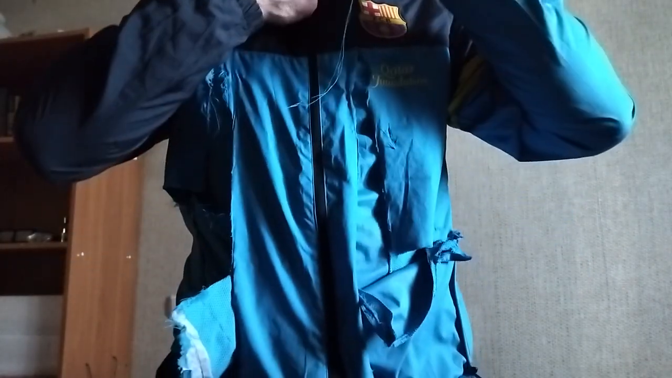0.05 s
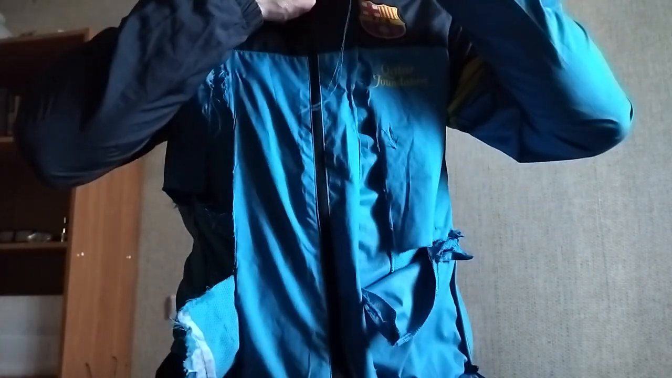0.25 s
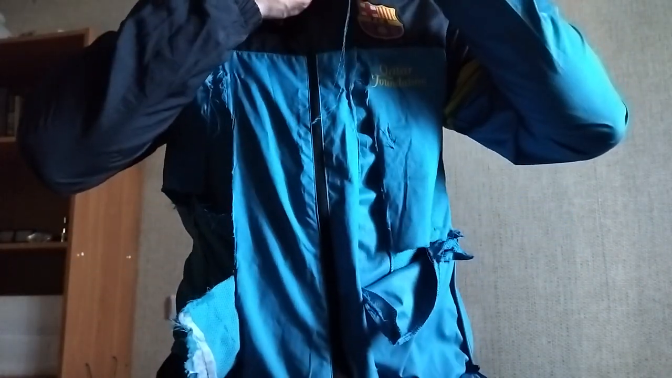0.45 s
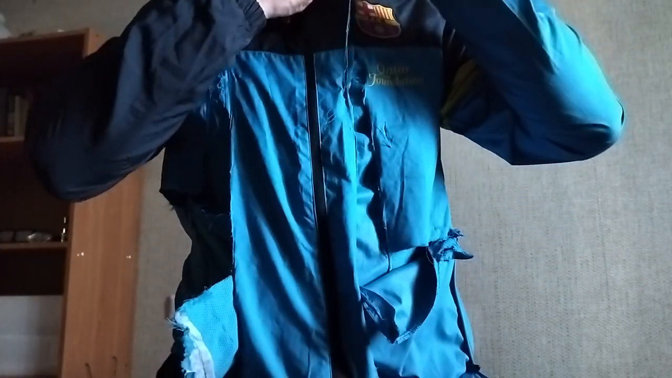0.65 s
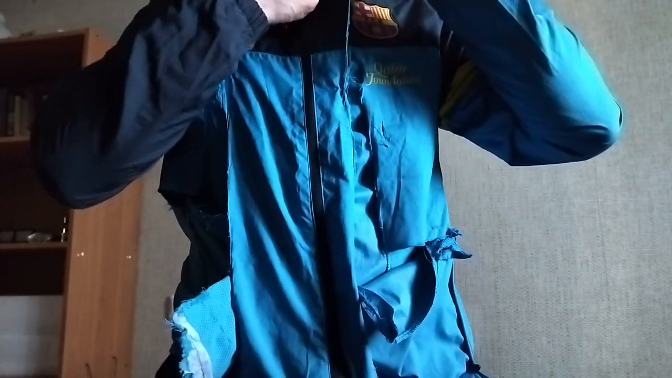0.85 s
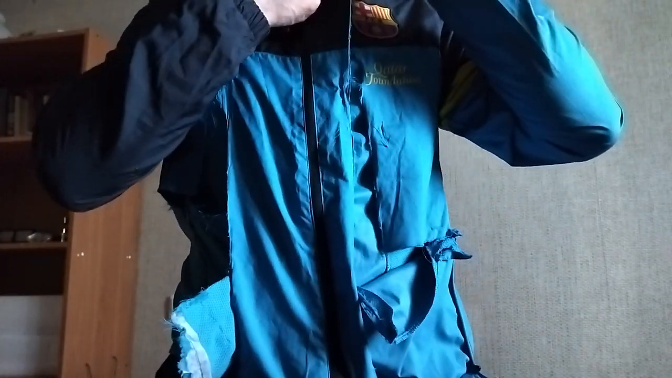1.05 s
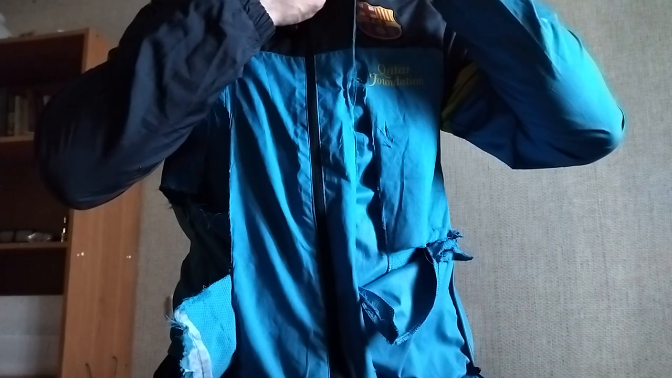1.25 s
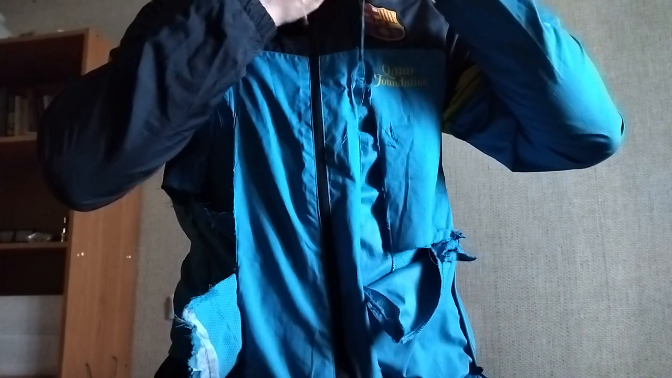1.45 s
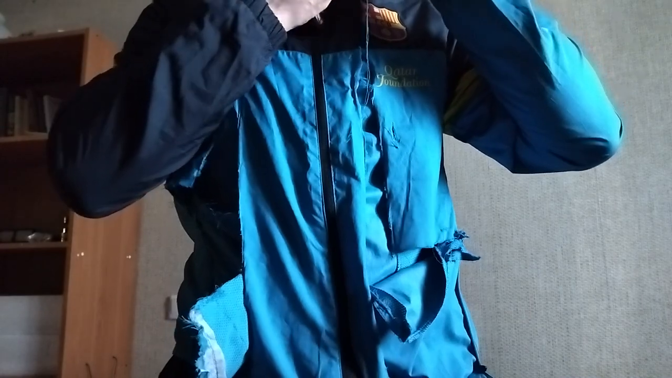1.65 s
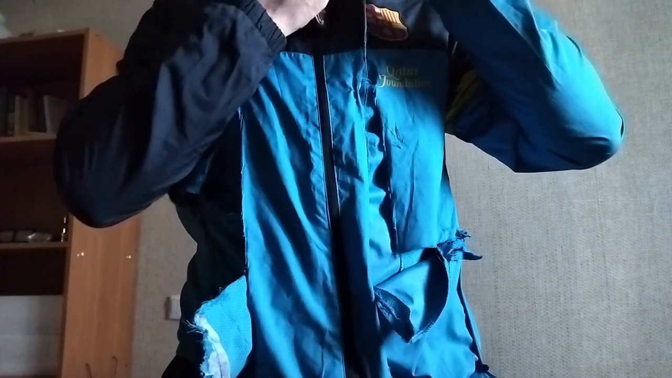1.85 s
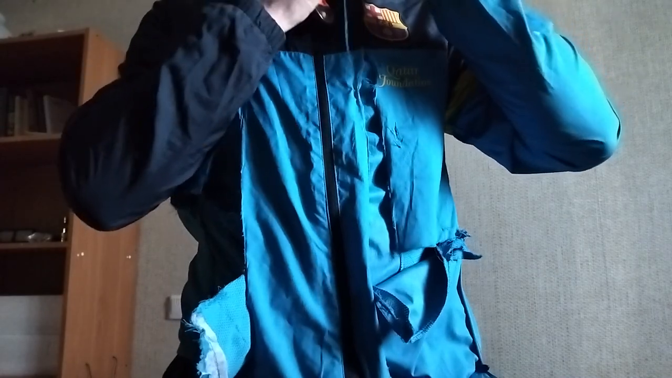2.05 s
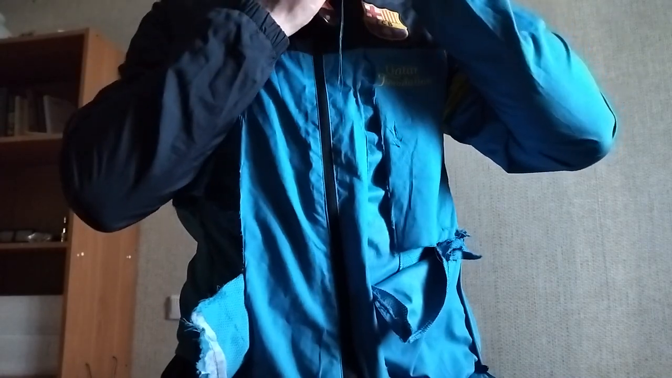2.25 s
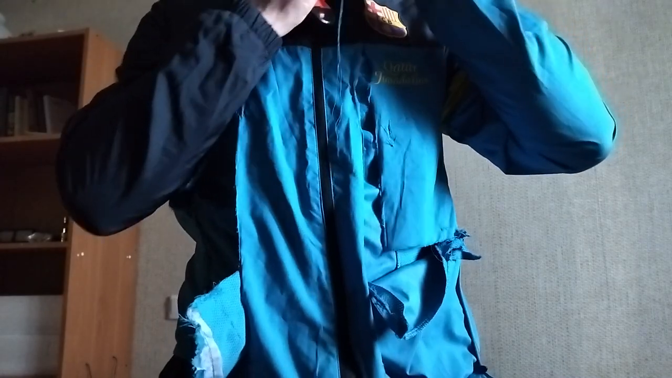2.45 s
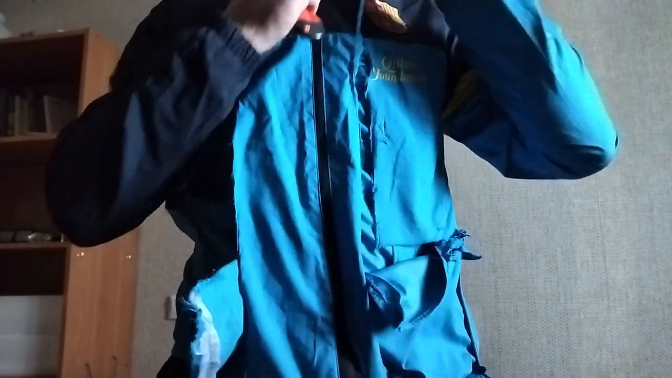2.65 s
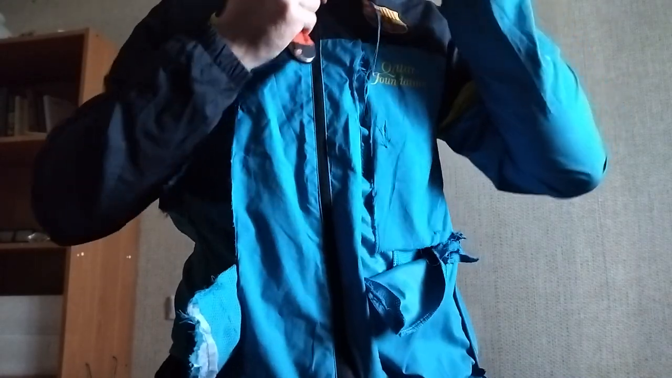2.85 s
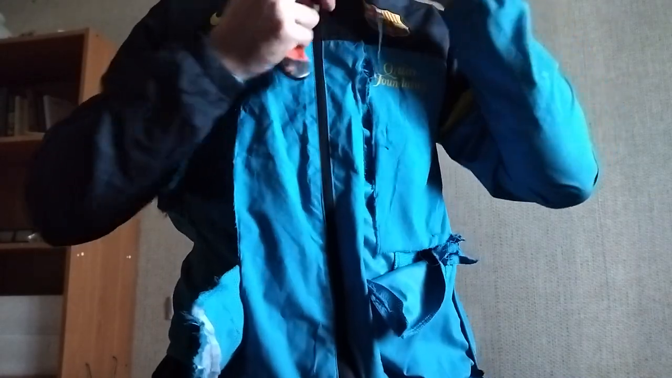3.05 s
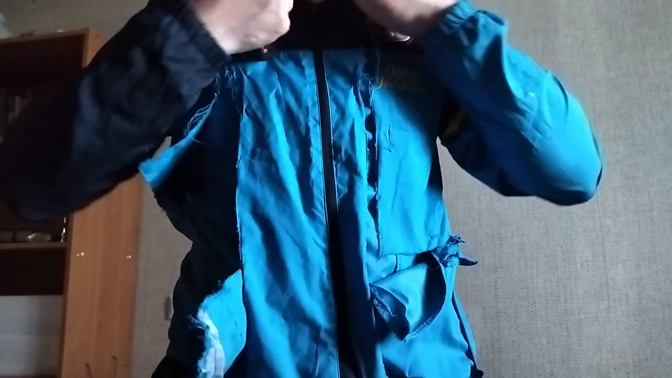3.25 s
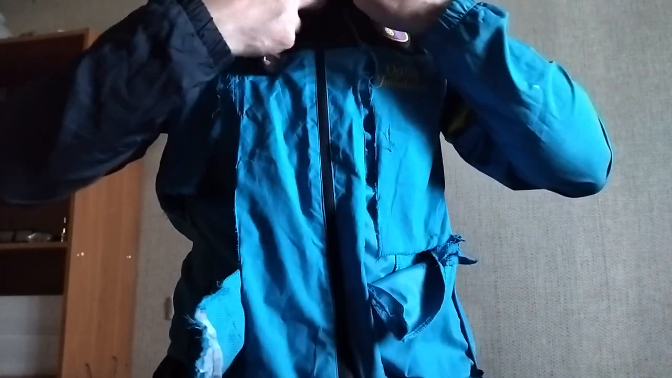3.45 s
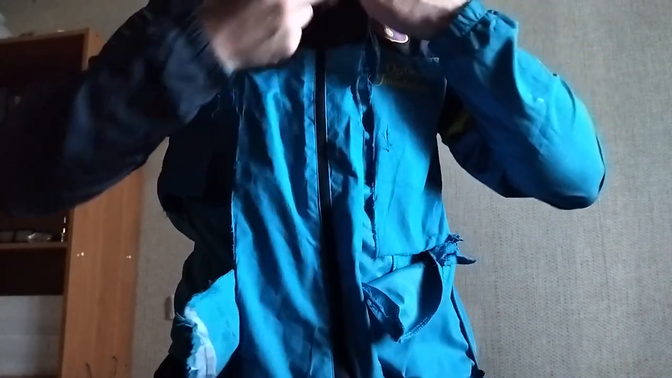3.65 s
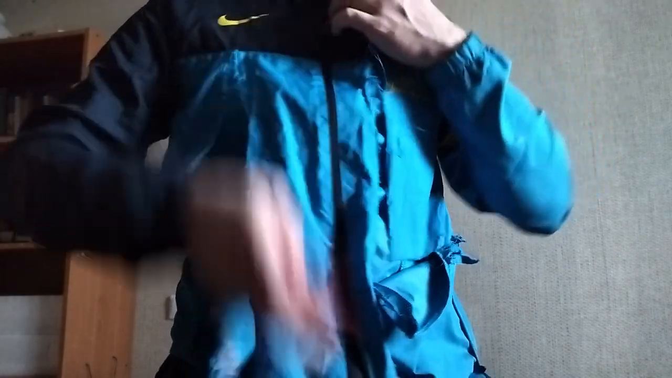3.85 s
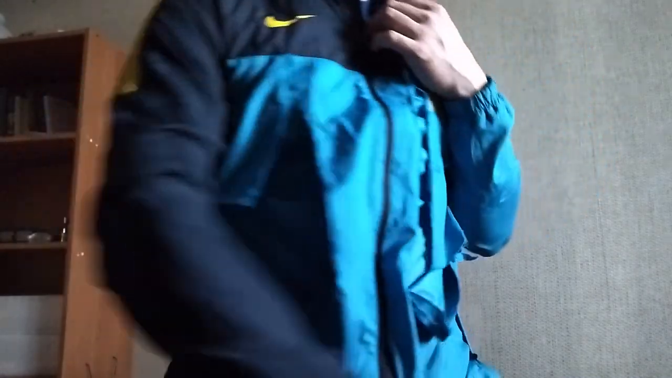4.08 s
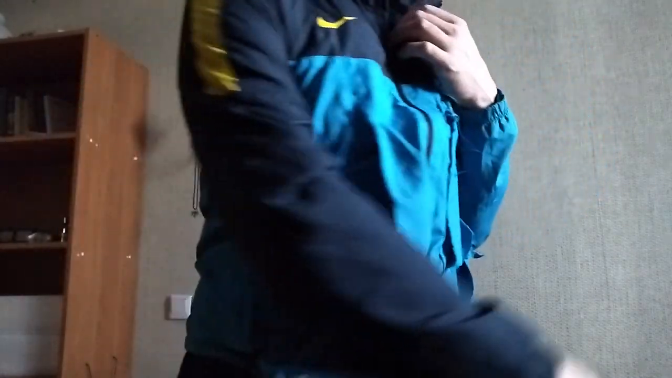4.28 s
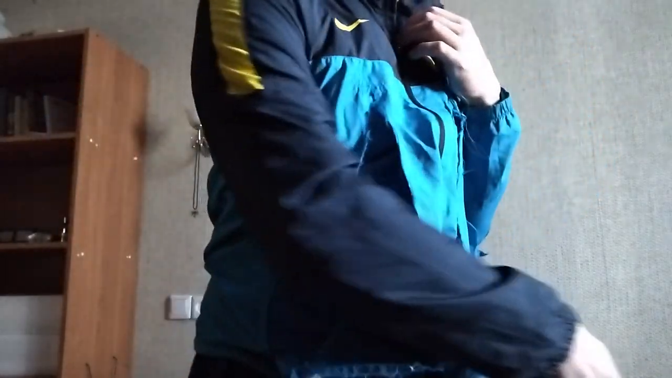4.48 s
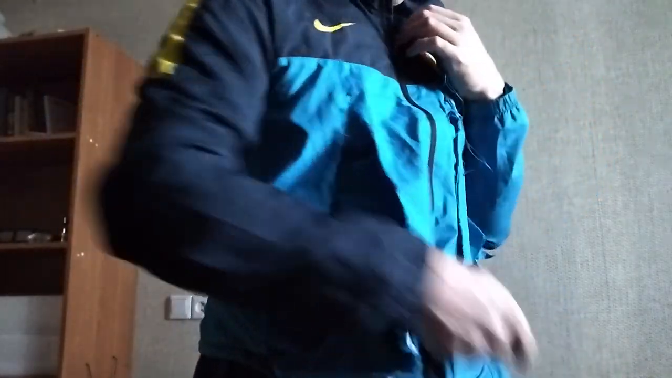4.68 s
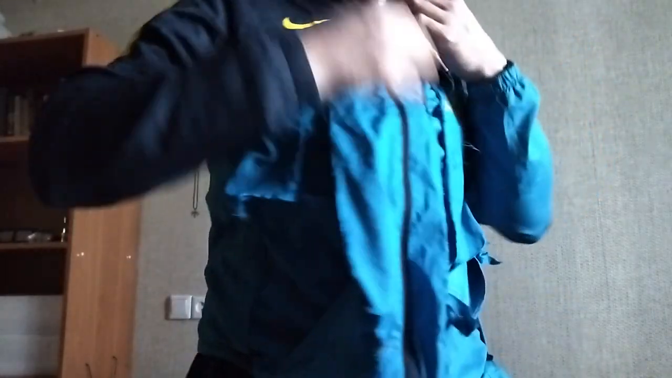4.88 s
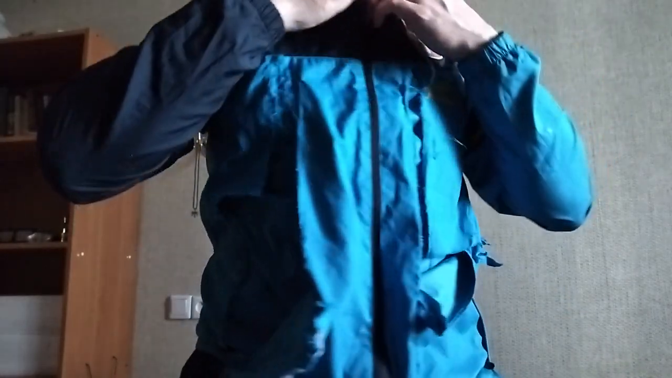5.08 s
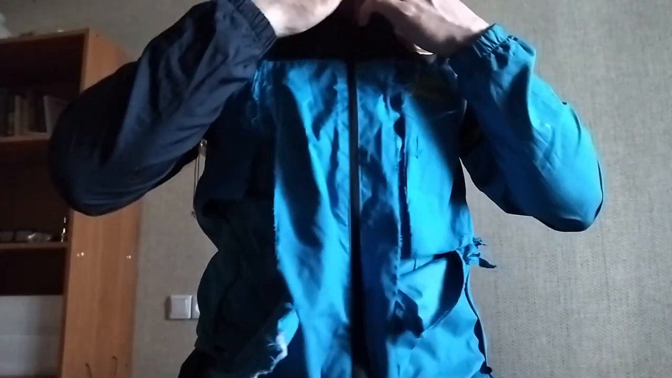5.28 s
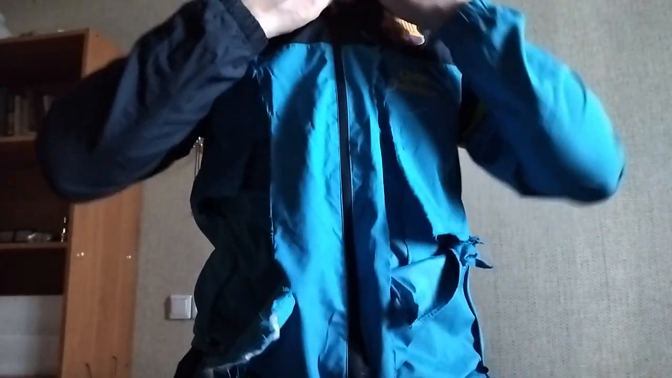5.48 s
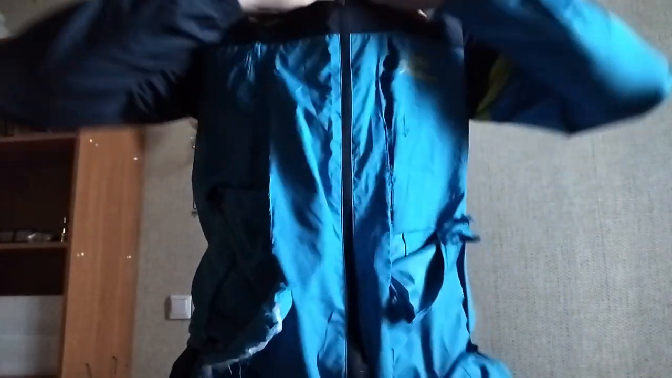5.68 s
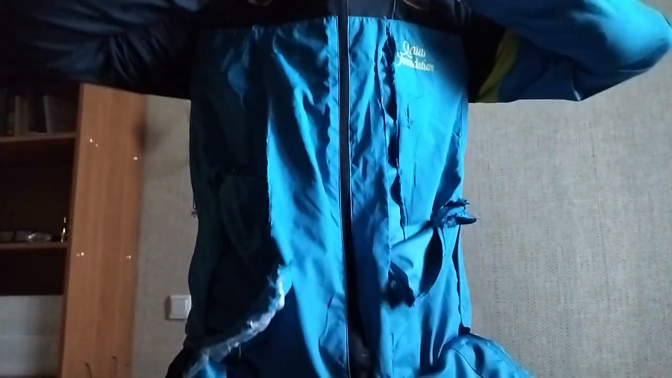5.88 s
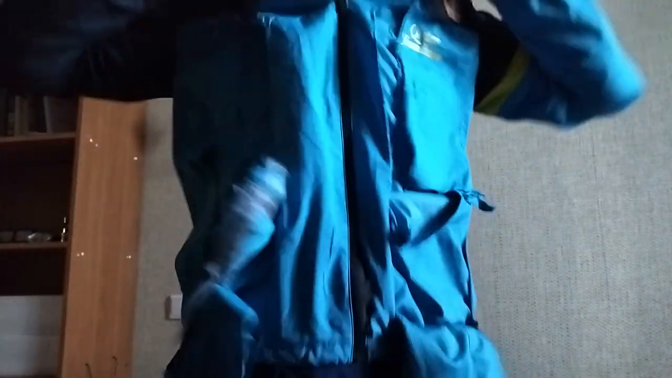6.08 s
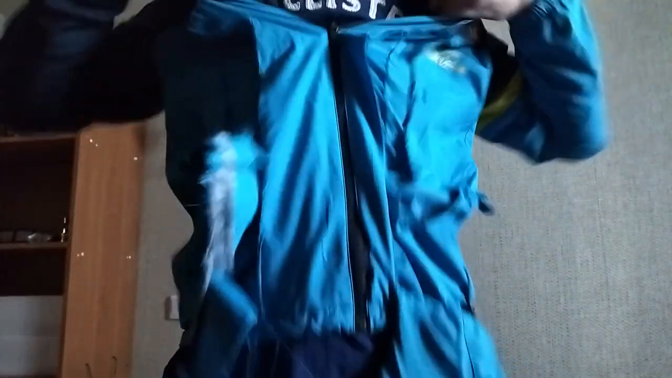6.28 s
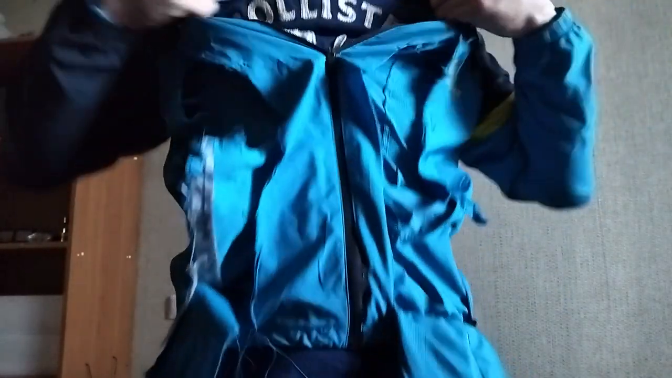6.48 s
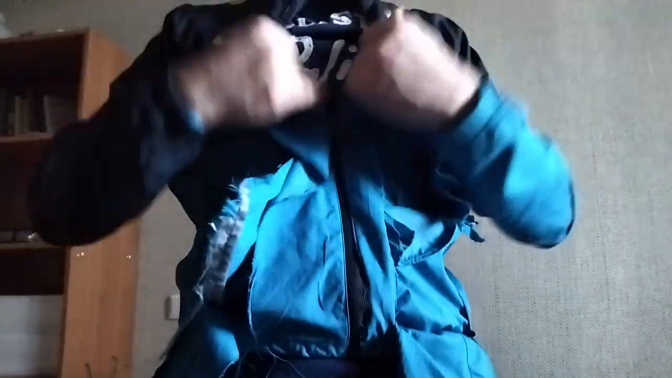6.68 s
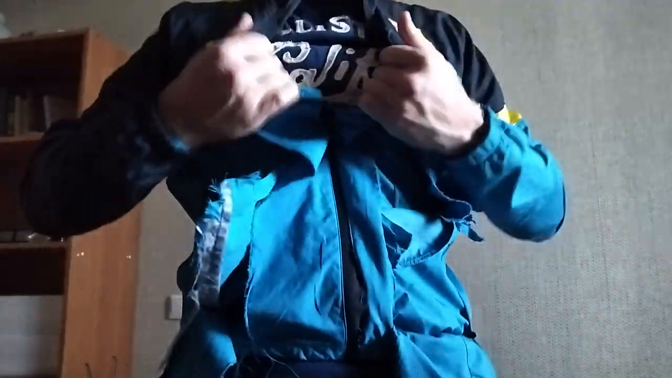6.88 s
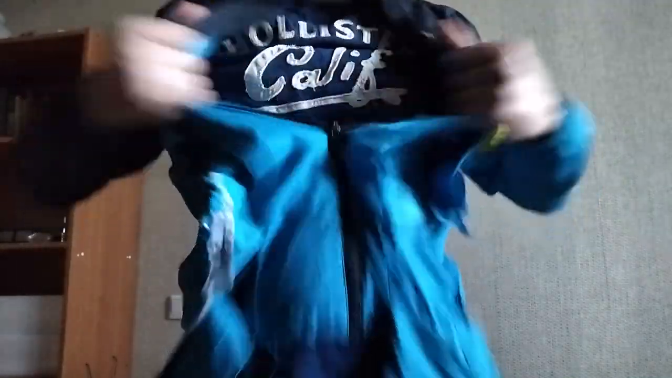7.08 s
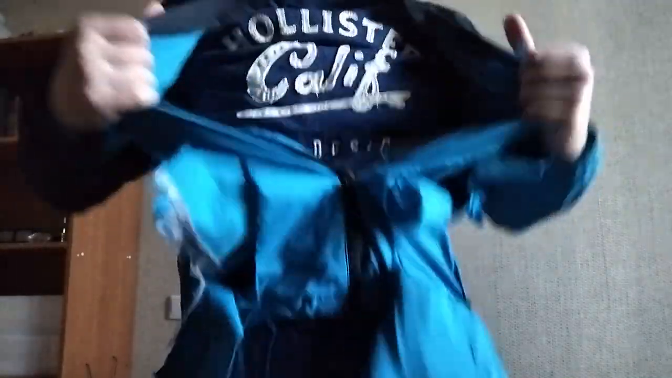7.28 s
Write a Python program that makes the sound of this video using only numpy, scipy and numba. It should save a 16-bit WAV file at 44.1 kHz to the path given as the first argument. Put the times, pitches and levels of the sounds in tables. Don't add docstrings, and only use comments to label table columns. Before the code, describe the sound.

Faint jacket scuffs and thread ticks lead to a short stuttering seam creak, more rustling, then sudden crackling fabric tears, very close.

```python
import sys
import numpy as np
from scipy import signal
from scipy.fft import rfft, irfft, next_fast_len
from scipy.io import wavfile
from scipy.ndimage import uniform_filter1d, minimum_filter1d
from numba import njit

SR = 44100
rng = np.random.default_rng(int(sys.argv[2]) if len(sys.argv) > 2 else 0)


def put_to_file(sound):
    columns = np.atleast_2d(sound).T
    safe = np.clip(columns, -1, 1)
    whole_steps = np.round(safe * 32767)
    wavfile.write(sys.argv[1], SR, whole_steps.astype(np.int16))


def nominal_scale(level):
    x = np.asarray(level, float) / 20
    return 10 ** x


N = 323253


def rms_one(x):
    return x / np.sqrt(np.mean(x ** 2) + 1e-20)


def evened(x, width_s):
    return x / np.sqrt(uniform_filter1d(x ** 2, size=round(width_s * SR)) + 1e-12)


def in_time(spans):
    s, *columns = np.transpose(np.concatenate(spans))
    t = np.arange(N) / SR
    running = sum((t >= rows[0][0]) & (t <= rows[-1][0]) for rows in spans) > 0
    return [np.interp(t, s, c) for c in columns] + [uniform_filter1d(running * 1., size=90)]


def colour(x, points):
    hz, db = np.transpose(points)
    grid = np.maximum(np.fft.rfftfreq(2048, 1 / SR), 1)
    log_gain = np.interp(np.log(grid), np.log(hz), db, left=db[0] - 12) * np.log(10) / 20
    cepstrum = irfft(log_gain)
    cepstrum[1:1024] *= 2
    cepstrum[1025:] = 0
    impulse = irfft(np.exp(rfft(cepstrum)))
    return signal.oaconvolve(np.atleast_2d(x), impulse[None], axes=1)[:, :np.shape(x)[-1]]


def drift(rate):
    r = np.exp(-40 * np.pi * rate / SR)
    slow = signal.lfilter([1], [1, -2 * r, r * r], rng.standard_normal(N // 20 + 2002))[2000:]
    return np.interp(np.arange(N) / 20, np.arange(len(slow)), rms_one(slow))


def grains(per_s, spread_db, clump_db):
    sizes = nominal_scale(spread_db * np.minimum(rng.exponential(1, N), 4)) * rng.choice([-1, 1], N)
    return sizes * (rng.random(N) < per_s * nominal_scale(clump_db * drift(60)) / SR)


def wide(make):
    own_share = 0.68
    return np.sqrt(1 - own_share) * make() + np.sqrt(own_share) * np.array([make(), make()])


def thump(hz, cycles):
    t = np.arange(600) / SR
    phase = 2 * np.pi * hz * t * (1 + 0.97 * np.exp(-t * hz * 2))
    swing = -np.sin(phase) * nominal_scale(-60 * t * hz / cycles)
    return swing / np.abs(swing).max()


def add(out, s, sound):
    i = round(s * SR)
    out[..., i:i + sound.shape[-1]] += sound[..., :N - i]


# (frequency [Hz], level [dB])
HUSH_SPECTRUM = [(25, -34), (60, -5), (170, 0.5), (290, -4), (355, -1.5), (480, -9.5), (1240, -8),
                 (2500, -16.5), (4460, -21.5), (6800, -20), (8600, -14.5), (10500, -18.5), (13000, -18.5),
                 (15500, -16)]


def hush():
    own, shared = rng.standard_normal((2, N)), rng.standard_normal(N)
    bass = signal.lfilter([.1], [1, -.9], shared) * 0.95
    return nominal_scale(-65) * rms_one(colour(own + bass, HUSH_SPECTRUM))


# (time [s], peak level [dB], fineness [0 folds, 1 weave, 2 crinkle], fade by 20 dB [s])
SCUFFS = [(0.68, -62, 1.8, .12), (0.918, -52, 1.7, .04), (1.06, -53, 1.45, .07), (1.145, -55, .5, .04),
          (1.12, -60, .8, .08), (1.375, -59, 1.8, .12), (1.56, -62, 1.9, .08), (1.64, -54, .3, .12),
          (1.68, -60, 1.1, .2), (2.09, -65, 1.1, .15), (3.298, -60, 1.3, .05), (3.33, -59, 1.1, .13),
          (3.55, -65, .8, .12), (3.678, -53, 1.6, .03), (3.7, -59, .4, .14), (3.92, -55, 1.6, .12),
          (3.984, -46, 1.4, .12), (4.035, -44, 1.45, .08), (4.256, -42, 1.1, .04), (4.27, -55, 1.05, .12),
          (4.41, -60, .5, .2), (4.825, -39, 1.2, .06), (4.84, -40, 1.3, .1), (4.87, -51, 1.2, .3),
          (5.82, -54, .1, .2), (5.47, -57, .1, .15), (6.019, -45, .9, .05), (6.04, -54, .9, .12),
          (6.13, -60, .2, .05)]
# (middle time [s], peak level [dB], fineness [0..2], fade by 20 dB [s])
SLIDES = [(0.19, -62, 1.8, .2), (0.79, -59, 1.6, .15), (0.98, -58, 1.35, .25), (1.28, -60, 1.8, .1),
          (1.53, -62, 1.9, .08), (1.63, -57, 1.8, .1), (2.1, -70, 1.05, .6), (2.56, -59, 1.6, .12),
          (2.76, -61, 1.95, .3), (3.09, -59, .1, .15), (3.5, -61, 1.8, .15), (3.54, -59, .4, .2),
          (3.58, -57, 1.7, .09), (4.52, -59, 1.4, .25), (4.12, -57, 1.1, .3), (4.74, -62, 1.7, .12),
          (5.25, -64, 1.6, .2), (5.5, -58, 1.95, .25), (5.9, -60, 1.8, .25), (6.8, -50, .4, .4),
          (6.8, -52, 1.9, .4), (7.08, -57, .2, .14)]


def scuffs(size):
    scuff_rise_s, focus_db = .006, 13
    t, power = np.arange(N) / SR, np.zeros(N)
    moves = [(*row, scuff_rise_s) for row in SCUFFS] + [(*row, row[-1]) for row in SLIDES]
    for s, db, fineness, fade_s, rise_s in moves:
        near = slice(max(round((s - .5) * SR), 0), round((s + .5) * SR))
        fall_db = 20 * np.maximum((s - t[near]) / rise_s, (t[near] - s) / fade_s)
        power[near] += nominal_scale(db - fall_db - focus_db * (fineness - size) ** 2) ** 2
    return np.sqrt(power)


# (time [s], level [dB], brightness gained per finer grain size [dB])
MOVEMENT = [(0.0, -68, 0.5), (0.45, -75, 0.5), (0.8, -65, 2), (1.3, -68, 1), (1.8, -72, -3),
            (2.35, -78, -2), (2.7, -66, -4), (3.25, -72, -2), (3.85, -78, 1), (4.15, -62, 3),
            (4.55, -66, -0.5), (4.7, -70, 1), (5.38, -70, 1), (5.52, -60, 1), (6.0, -64, -1),
            (6.6, -56, -2), (6.96, -68, -1), (7.16, -62, -1)]
# (frequency [Hz], level [dB])
FOLDS = [(120, -58), (300, -5), (600, -7.5), (1200, -6.5), (2000, -9.5), (3500, -22)]
# (frequency [Hz], level [dB])
SWISH = [(1300, -32.5), (1750, -8), (2050, -3.5), (2600, -3), (4300, -2.5), (5000, -10.5), (6500, -9),
         (8000, -29)]
# (frequency [Hz], level [dB])
CRINKLE = [(4500, -3), (6800, -16), (8800, 4), (10800, -8), (13000, -3.5), (15500, -5)]


def rustle():
    move_db, bright_db, _ = in_time([MOVEMENT])
    flicker_db = 2.1 * drift(42)
    layers = [(FOLDS, 2500, -1.0), (SWISH, 6000, -1.5), (CRINKLE, 9000, 0.3)]   # (spectrum, grains per s, dB)
    out = np.zeros((2, N))
    for size, (points, per_s, db) in enumerate(layers):
        grit = colour(wide(lambda: grains(per_s, spread_db=2.5, clump_db=4.0)), points)
        sleeves = nominal_scale(move_db + bright_db * (size - 1) - 1.5 * (size == 1))
        level = np.hypot(sleeves, scuffs(size))
        out += level * nominal_scale(db + flicker_db + 2.0 * drift(16.4)) * evened(grit, 0.06)
    return out


# (frequency [Hz], level [dB])
CRACKLE = [(1200, -14.5), (2500, 0), (5000, -5), (6900, -11), (8800, -3), (10800, -6.5), (12200, 1),
           (15500, 1)]


def breaks(rows, cycles, crack_s, thump_db, crack_db):
    out, t = np.zeros((2, N)), np.arange(600) / SR
    noise = rng.standard_normal((len(rows), 3, 600))
    envelope = (1 - np.exp(-t / 0.0009)) * np.exp(-t / crack_s)
    for (s, db, hz, high_db, pan_db), burst in zip(rows, noise):
        crack = colour((burst[0] + 2.4 * burst[1:]) * envelope, CRACKLE)
        crack = nominal_scale(high_db + crack_db) * crack / np.abs(crack).max()
        sound = nominal_scale(thump_db) * thump(hz, cycles * max(1, hz / 2500)) + crack
        sides = nominal_scale(np.clip(pan_db, -6, 6) * np.array([[.5], [-.5]]))
        add(out, s + .0012, nominal_scale(db) * sound * sides)
    return out


# (time [s], thump level [dB], thump pitch [Hz], crack re thump [dB])
TICKS_LEFT = [(0.9, -50, 8730, 4), (0.913, -52, 1600, -.5), (0.916, -54, 1700, 0), (0.961, -56, 1500, -3),
              (0.985, -46, 7680, -4), (1.056, -41.5, 4550, -8), (3.2955, -39, 7800, -14),
              (3.336, -45.5, 4430, -8.5), (3.6785, -36, 8000, -6), (3.967, -42, 7700, -4),
              (3.984, -40, 8790, -1), (3.993, -39, 8600, -7), (4.011, -41, 7900, -21),
              (4.036, -52, 3160, 6)]
# (time [s], thump level
# [dB], thump pitch [Hz], crack re thump [dB])
TICKS_FRONT = [(0.595, -62, 556, 4), (1.024, -57, 960, 7), (1.131, -58, 1300, -8), (1.145, -55, 1900, -10),
               (1.149, -49.5, 1500, -12), (1.158, -57, 1900, -8), (1.221, -57, 1160, -7),
               (1.641, -43.5, 960, -13.5), (1.91, -55, 4100, 4.5), (2.027, -55, 4140, -6),
               (2.079, -60, 1390, .5), (2.605, -49, 905, -25), (3.32, -44.5, 1060, -24),
               (3.538, -55, 1560, 1.5), (4.136, -51, 3200, -10), (6.006, -55, 1020, -6),
               (6.018, -40, 620, 8)]
# (time [s], thump level [dB], thump pitch [Hz], crack re thump [dB])
TICKS_RIGHT = [(4.168, -40, 3200, -7), (4.255, -32.5, 4450, .5), (4.826, -40, 2660, -4.5),
               (4.839, -35, 3370, -3), (6.024, -52, 2000, -2)]


def ticks():
    hands = ((TICKS_LEFT, 6), (TICKS_FRONT, 0), (TICKS_RIGHT, -6))
    rows = [(*row, pan_db) for table, pan_db in hands for row in table]
    return breaks(rows, cycles=9, crack_s=0.0016, thump_db=9, crack_db=10.5)


# (time [s], peak level [dB],
# pitch [Hz])
SLIPS = [(2.48, -46, 1200), (2.498, -41, 1100), (2.51, -38, 1310), (2.52, -39, 1080), (2.529, -37, 1110),
         (2.542, -46, 1260), (2.557, -43, 1640), (2.572, -42, 2170), (2.585, -40, 945), (2.618, -47, 732),
         (2.636, -49, 746), (2.65, -46, 1100), (2.661, -43, 1440), (2.673, -42, 762), (2.684, -48, 904),
         (2.696, -49, 756), (2.706, -51, 886), (2.715, -49, 912),
         (3.051, -53, 754), (3.064, -50, 1030), (3.073, -50, 1040), (3.094, -47, 1070),
              (3.142, -49, 883)]


def lone_slips():
    out = np.zeros(N)
    for s, db, hz in SLIPS:
        add(out, s + .001, nominal_scale(db + 2) * thump(hz, cycles=6.5))
    return out


# (time [s], slip rate [per s], level [dB])
CREAK = [(2.722, 75, -66), (2.74, 85, -57), (2.78, 150, -51.5), (2.82, 156, -47.5), (2.86, 220, -53.5),
         (2.9, 200, -63), (2.93, 200, -74)]
# (frequency [Hz], width [Hz], level [dB])
SEAM = [(174, 120, 15), (413, 100, 9.5), (673, 180, 10.5), (1250, 270, -22), (2100, 1000, -36)]


def creak():
    per_s, level_db, running = in_time([CREAK])
    turns = np.cumsum(per_s * running * (1 + 0.062 * drift(80))) / SR
    slips = np.diff(np.floor(turns), prepend=0) * nominal_scale(rng.normal(0, 2.5, N))
    train = np.zeros(N)
    for hz, width_hz, db in SEAM:
        r = np.exp(-np.pi * width_hz / SR)
        poles = [1, -2 * r * np.cos(2 * np.pi * hz / SR), r * r]
        train += nominal_scale(db) * signal.lfilter([1, 0, -1], poles, slips + 1e-18) * (1 - r * r)
    soft = signal.butter(2, 2200, fs=SR, output="sos")
    return signal.sosfilt(soft, lone_slips() + running * nominal_scale(level_db) * evened(train, 0.017))


# (time [s], thump level [dB], thump pitch [Hz], crack re thump [dB], left-right [dB])
SNAPS = [(6.131, -39, 800, -10, -1), (6.155, -1, 646, -10.5, -5.5), (6.178, -3, 650, -4.5, -2.5),
         (6.273, -19, 1030, 9, 6), (6.296, -14, 1100, 1, 3.5), (6.403, -18, 870, 1, .5),
         (6.419, -18, 820, 4, 1.5), (6.437, -18, 770, 8, -6), (6.486, -14, 1250, 1, -6),
         (6.538, -10, 800, -2, 6), (7.172, -8, 1700, -4, 1.5), (7.181, -7, 1900, -3, .5),
         (7.187, -15, 2400, 5, .5), (7.1885, -7, 1150, -10, .5), (7.2035, -3, 1650, -8, -4),
         (7.21, -8, 1070, -17, -6), (7.2155, -5, 950, -4, 4), (7.2255, -7, 1900, -2, 6),
         (7.238, -14, 1310, 4, 6)]


def snaps():
    return breaks(SNAPS, cycles=5.1, crack_s=0.0012, thump_db=-4.0, crack_db=0.5)


@njit
def moving_ring(clicks, hz, cycles, sr):
    out = np.zeros(len(clicks))
    for i in range(2, len(clicks)):
        r, w = 10 ** (-3 * hz[i] / (cycles * sr)), 2 * np.pi * hz[i] / sr
        out[i] = np.sin(w) * clicks[i - 1] + 2 * r * np.cos(w) * out[i - 1] - r * r * out[i - 2]
    return out


# (time [s], force on the cloth [dB], pitch of the taut cloth [Hz], speed of the rip [dB])
PULLS = [
    [(6.159, -25, 720, -4), (6.171, -41, 740, 4), (6.181, -28, 690, -4), (6.205, -30, 700, 3),
     (6.228, -22, 780, 2), (6.293, -35.5, 880, -5), (6.33, -46, 760, -11), (6.395, -58, 704, -17)],
    [(6.4, -46, 800, -6), (6.406, -29, 854, -10), (6.452, -29.5, 830, 3), (6.472, -34.5, 968, 5),
     (6.492, -27, 1020, 0.5), (6.532, -30.5, 900, -2), (6.56, -43, 800, -9), (6.66, -57, 855, -12)],
    [(7.1695, -48, 1070, 4), (7.187, -31.5, 1090, -1), (7.2, -44, 1050, -1), (7.207, -24, 1100, -3),
     (7.222, -31, 1080, -8), (7.228, -24, 1220, 2.5), (7.258, -27, 1220, 2), (7.286, -23, 1060, -2),
     (7.33, -24, 1060, 0.5)],
]
# (multiple of its pitch [ratio], level [dB], ring until silent [cycles])
MEMBRANE = [(.33, -7, 5), (.5, 6, 8), (.8, -1, 12), (1.05, 13, 16), (1.35, 13, 9), (1.75, 14.5, 11.0),
            (2.3, 6, 15), (3.2, -10, 6.8)]


def pulls():
    drum_db, hz, speed_db, running = in_time(PULLS)
    crackle_db, upper_db = 1.05 * speed_db, 0.6 * speed_db
    threads = grains(2500, spread_db=2.5, clump_db=2.0)
    start = round(PULLS[0][0][0] * SR) - 4000
    lower, upper = np.zeros((2, N))
    for k, (multiple, db, cycles) in enumerate(MEMBRANE):
        struck = threads * nominal_scale(db + rng.normal(0, 4.1, N) + 7.0 * drift(25))
        modes = lower if k < len(MEMBRANE) // 2 else upper
        modes[start:] += moving_ring(struck[start:], multiple * hz[start:], cycles, SR)
    drum = evened(lower, .04) + nominal_scale(upper_db + 5.0) * evened(upper, 0.033)
    fibres = wide(lambda: grains(9000, spread_db=2.5, clump_db=4.5))
    crackle = colour(.5 * rms_one(threads) + rms_one(fibres), CRACKLE)
    crackle = nominal_scale(crackle_db + 8.8) * evened(crackle, 0.051)
    both = nominal_scale(-3.5) * drum * nominal_scale([[-.6], [.6]]) + crackle * nominal_scale([[.8], [-.8]])
    return running * nominal_scale(drum_db - 3) * both


# (start time [s], length [s], thread rate [per s], level [dB])
RUNS = [(6.187, .004, 900, -28), (6.195, .01, 650, -26), (6.204, .004, 580, -26), (6.213, .005, 630, -24),
        (6.217, .005, 1450, -24), (6.2215, .014, 725, -17.5), (6.236, .006, 1050, -20.5),
        (6.241, .004, 720, -26), (6.249, .012, 610, -24), (6.265, .005, 730, -29), (6.273, .004, 1050, -26),
        (6.299, .004, 770, -25), (6.312, .005, 735, -32), (6.4035, .005, 900, -21), (6.409, .003, 950, -19),
        (6.4185, .007, 800, -21), (6.426, .004, 900, -30), (6.436, .004, 1340, -23),
        (6.439, .007, 760, -21), (6.451, .007, 740, -25), (6.461, .004, 1230, -28),
        (6.467, .004, 1250, -26), (6.472, .004, 1200, -27), (6.486, .004, 770, -26),
        (6.49, .005, 1210, -24), (6.502, .004, 2130, -27), (6.507, .008, 930, -24), (6.532, .003, 780, -28),
        (7.182, .003, 750, -23), (7.2045, .004, 1400, -17), (7.209, .004, 900, -21),
        (7.215, .003, 820, -21), (7.228, .005, 1290, -14), (7.234, .003, 1400, -20),
        (7.2385, .003, 1330, -21), (7.242, .003, 1000, -24), (7.245, .004, 1600, -26),
        (7.251, .007, 1130, -22), (7.264, .006, 1230, -21), (7.277, .011, 960, -23),
        (7.29, .005, 1230, -23), (7.306, .003, 560, -25), (7.309, .007, 1150, -22), (7.32, .003, 600, -27),
        (7.324, .004, 1200, -26)]


def runs():
    out = np.zeros(N)
    for (s, length_s, hz, db), chance in zip(RUNS, rng.standard_normal((len(RUNS), 8))):
        along = np.linspace(0, 1, round(length_s * SR) + 40)
        wander = np.interp(along, np.linspace(0, 1, 8), chance)
        turn = 2 * np.pi * np.cumsum(hz * (1 + .07 * wander)) / SR
        overtone_db = -5 - 7 * np.log2(hz / 700) + 3.0 * wander[::-1]
        buzz = nominal_scale(overtone_db) * np.cos(2 * turn) - np.sin(turn)
        add(out, s - .0005, nominal_scale(db) * buzz * np.sqrt(np.sin(np.pi * along)))
    return out * nominal_scale([[-.9], [.9]])


# (frequency [Hz], level [dB], decay by 60 dB [s])
CHEST = [(608, -35, 0.21), (735, -25, 0.057), (1230, -43, 0.15), (1417, -19.5, 0.047)]


def hollow(x):
    out = x.copy()
    for hz, db, t60 in CHEST:
        r, w = nominal_scale(-60 / (t60 * SR)), 2 * np.pi * hz / SR
        ring = signal.lfilter([0, np.sin(w)], [1, -2 * r * np.cos(w), r * r], x + 1e-18)
        out += nominal_scale(db) * np.sqrt(1 - r) * ring
    return out


def room(x):
    t60_s, wall_cut_hz, room_db = 0.28, 6900, 1.5
    right_lag_s = 7.5e-5
    size = next_fast_len(N + SR)
    w = 2 * np.pi * np.fft.rfftfreq(size, 1 / SR)
    wall = 1 / (1 + 1j * w / (2 * np.pi * wall_cut_hz))
    spectrum = rfft(x, size)
    echoes = np.zeros_like(spectrum)
    for k, lag_s in enumerate(rng.uniform(.004, .03, 20)):
        loop = nominal_scale(-60 * lag_s / t60_s) * wall ** (lag_s / 0.042) * np.exp(-1j * w * lag_s)
        echoes[k % 2] += loop / (1 - loop) * (-1) ** (k // 2) * np.sqrt(lag_s / .03) / 4
    side = (echoes[0] - echoes[1]) / 2 / (1 + (2 * np.pi * 900 / (w + 1)) ** 2)
    echoes = echoes.mean(axis=0) + side * [[1], [-1]]
    direct = np.exp(-1j * w * np.array([[0], [right_lag_s]]))
    return irfft(spectrum * direct + spectrum.mean(axis=0) * echoes * nominal_scale(room_db), size)[:, :N]


def scene():
    rips = pulls() + runs() + snaps()
    jacket = hollow(rips) + ticks() + rustle() + creak()
    no_bass = signal.butter(2, 250, "high", fs=SR, output="sos")
    return room(signal.sosfilt(no_bass, jacket)) + hush()


# (frequency [Hz], level [dB])
LINE_THRESHOLD = [(1800, -40), (2400, -6), (3400, 0), (4800, 2.4), (16000, 2.8)]


def thin_treble(x):
    masked_db, chance_db = 14, 5
    ms = np.array([x[0] + x[1], x[0] - x[1]]) / 2
    frames = dict(fs=SR, window="cosine", nperseg=2048, noverlap=1024)
    hz, t, lines = signal.stft(ms, **frames)
    power = np.abs(lines) ** 2
    around = uniform_filter1d(power, size=40, axis=1)
    treble = uniform_filter1d(np.diff(x[0], prepend=0) ** 2, size=128)[::128]
    jump = treble / uniform_filter1d(treble, size=8, origin=3)
    highest_jump = -minimum_filter1d(-jump, size=16)
    attack = highest_jump[np.minimum(np.arange(len(t)) * 8, len(jump) - 1)] > 3.6
    keep_db = np.interp(hz, *np.transpose(LINE_THRESHOLD))[:, None]
    kept = lines * ((power > around * nominal_scale(2 * keep_db)) | attack)
    left = uniform_filter1d(np.abs(kept) ** 2, size=40, axis=1)
    kept *= np.sqrt(around / (left + .1 * around + 1e-20) * 1.1)
    luck_db = chance_db * np.repeat(rng.standard_normal((1, 41, len(t))), 25, axis=1)
    top_treble = around[:, 540:720].mean(axis=1, keepdims=True)
    audible = around > top_treble * nominal_scale(-2 * (masked_db + luck_db))
    kept *= audible | attack | (hz[:, None] < 3200)
    mid, side = signal.istft(kept, **frames)[1][:, :N]
    return np.array([mid + side, mid - side])


def band_limit(x):
    return signal.sosfilt(signal.butter(12, 17000, fs=SR, output="sos"), x)


def record(dry):
    cut = signal.sosfilt(signal.butter(2, 60, "high", fs=SR, output="sos"), dry)
    cut = thin_treble(0.84 * np.tanh(cut / 0.78))
    cut = signal.sosfilt(signal.cheby2(14, 50, 16100, fs=SR, output="sos"), cut)
    return band_limit(cut)


dry = scene()
out = record(dry)
put_to_file(out)
```